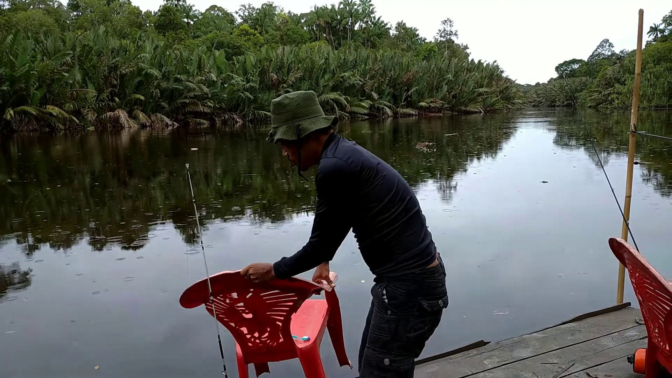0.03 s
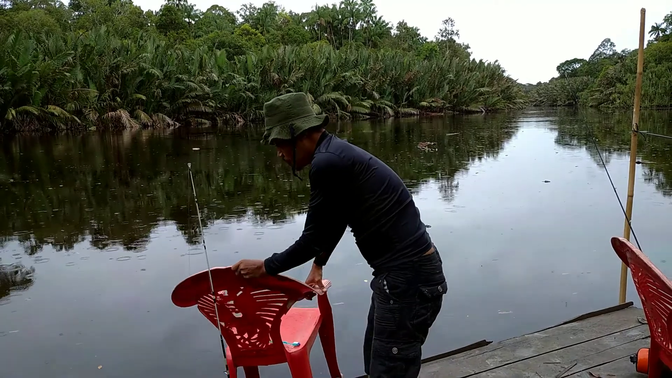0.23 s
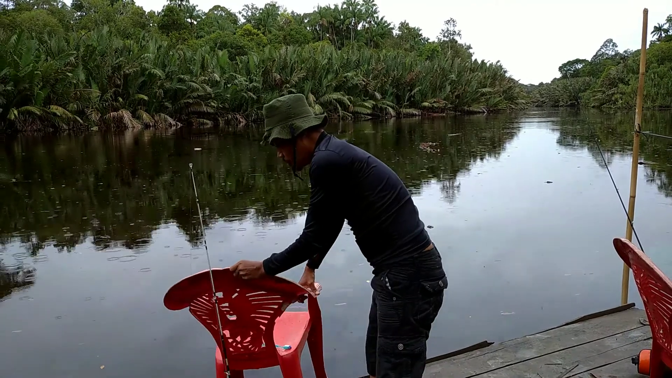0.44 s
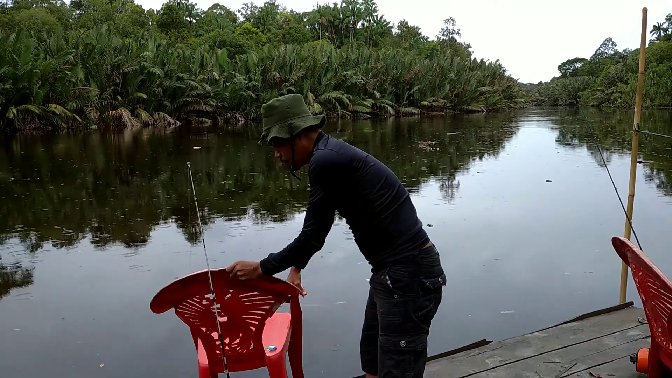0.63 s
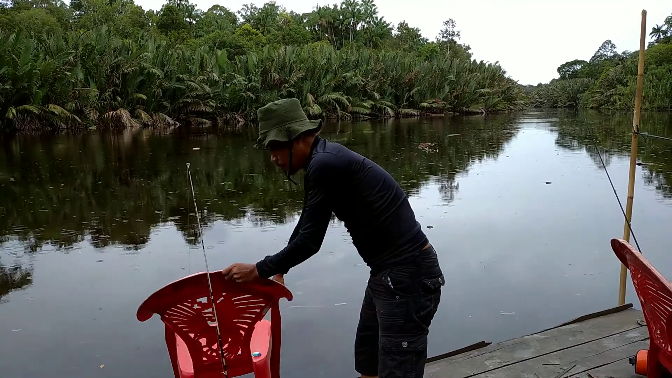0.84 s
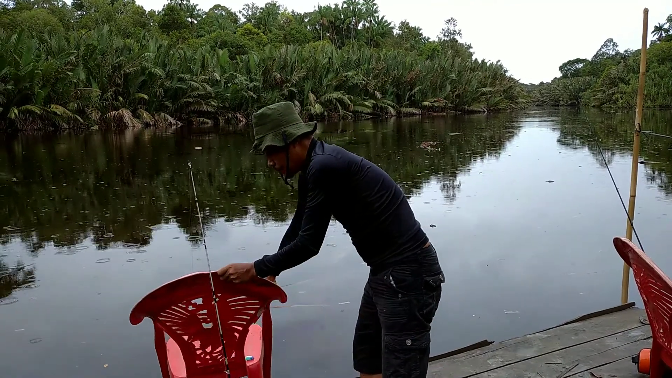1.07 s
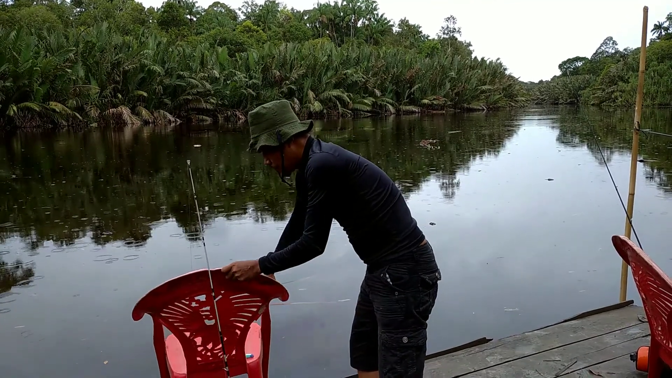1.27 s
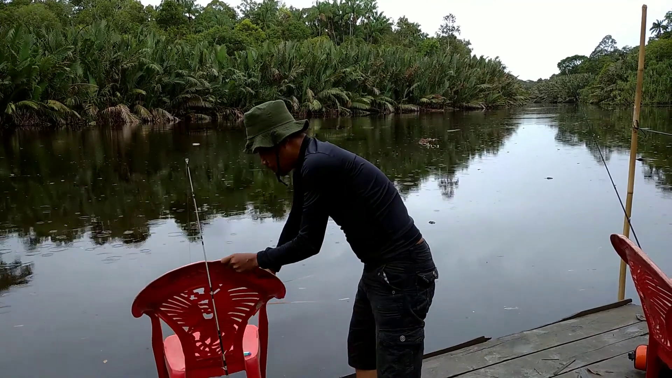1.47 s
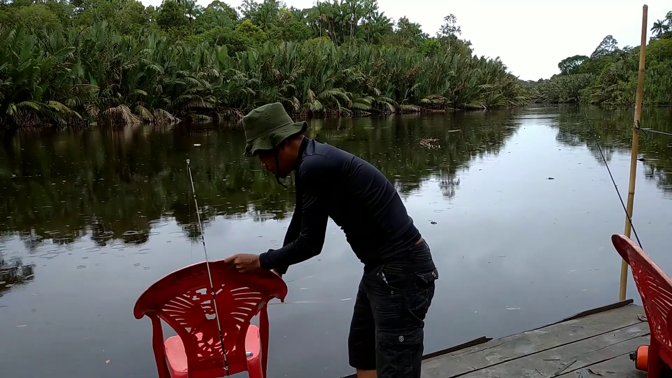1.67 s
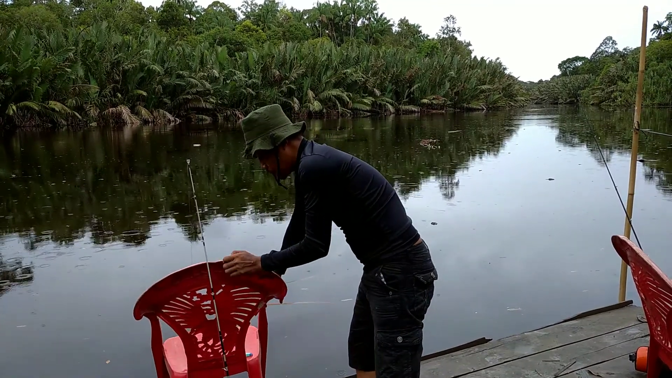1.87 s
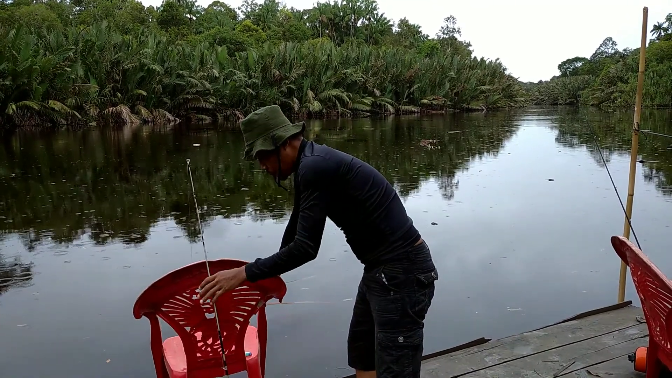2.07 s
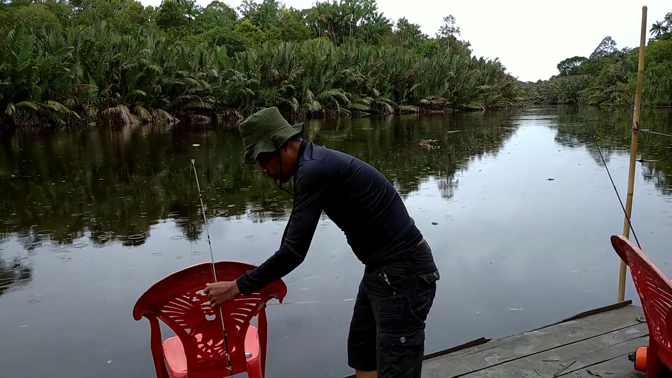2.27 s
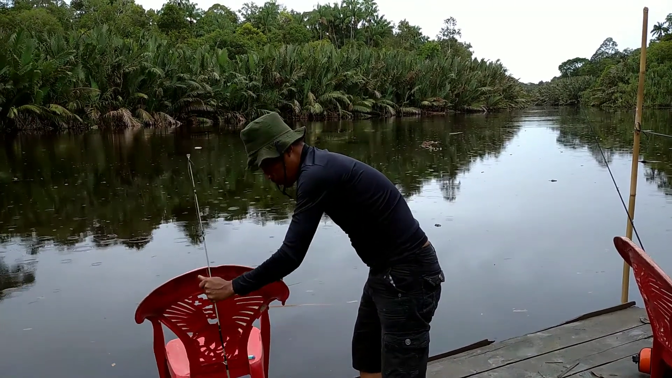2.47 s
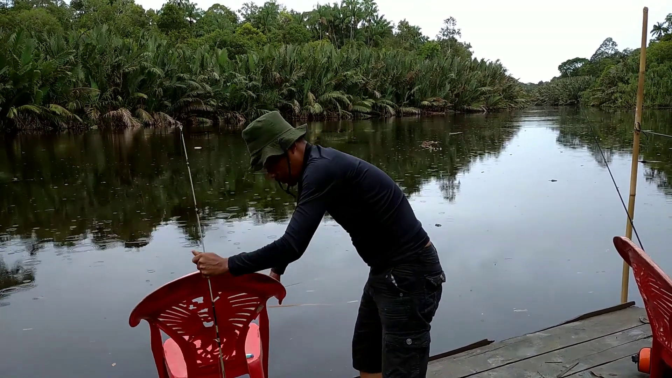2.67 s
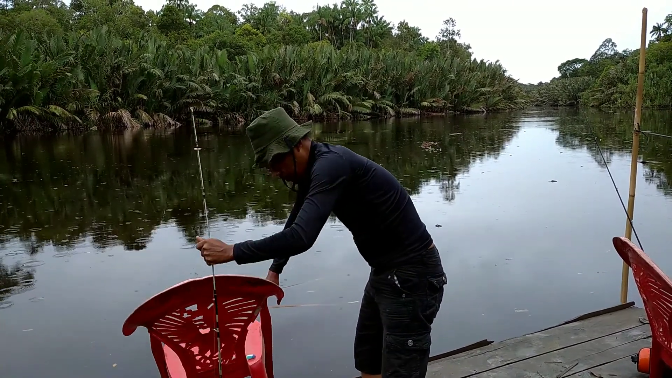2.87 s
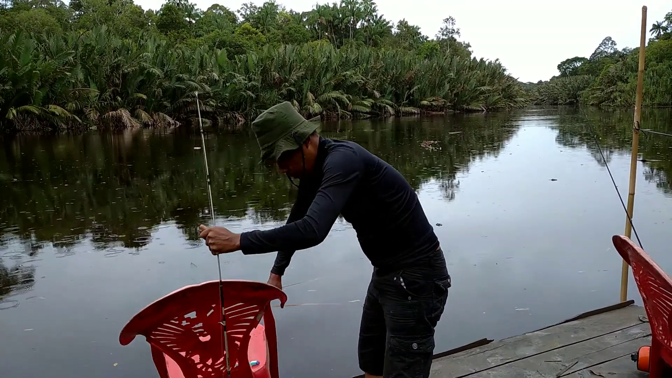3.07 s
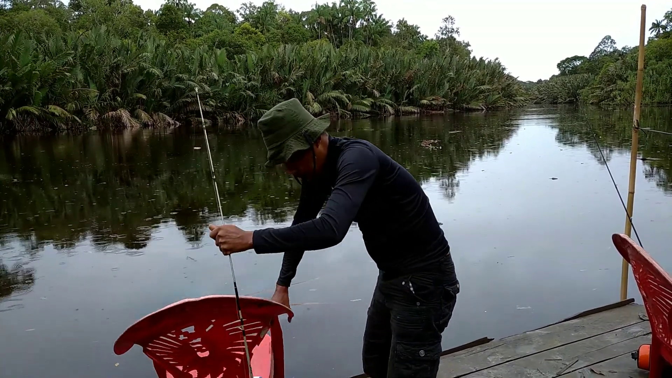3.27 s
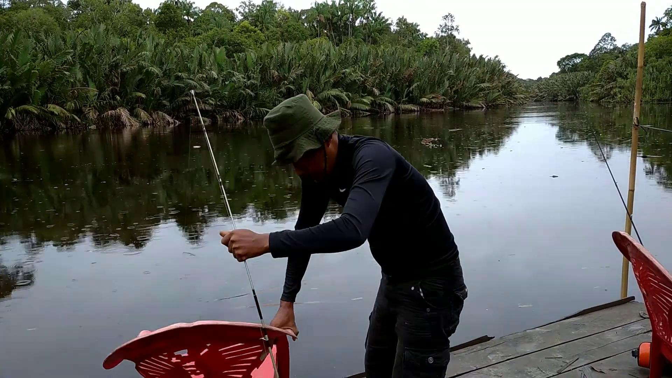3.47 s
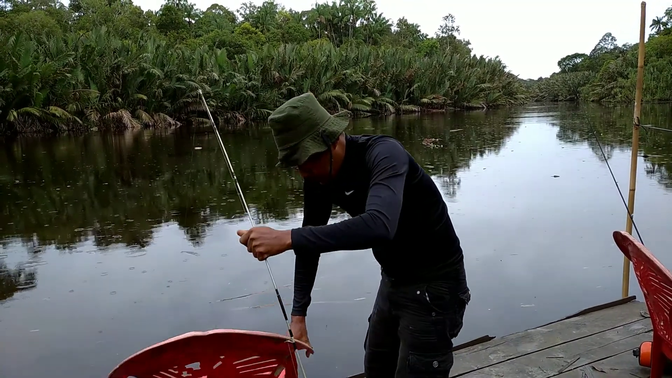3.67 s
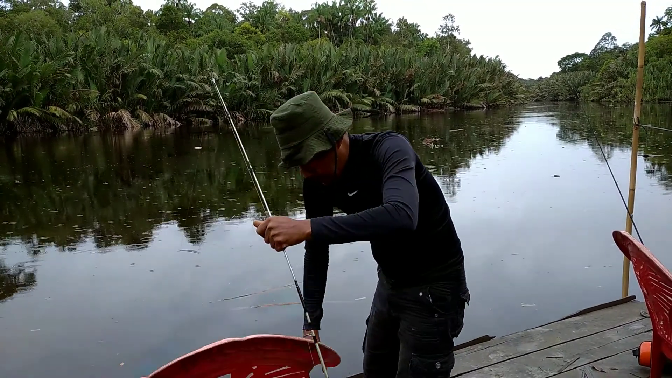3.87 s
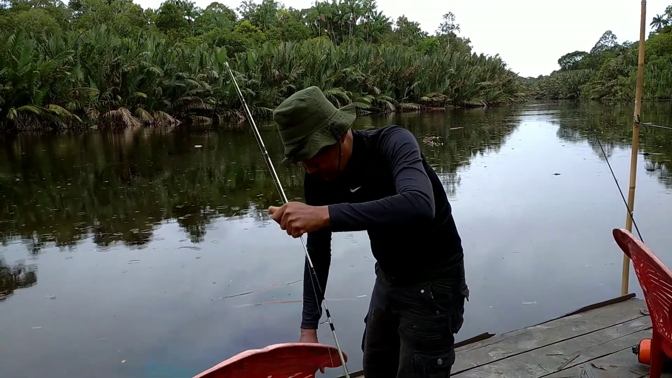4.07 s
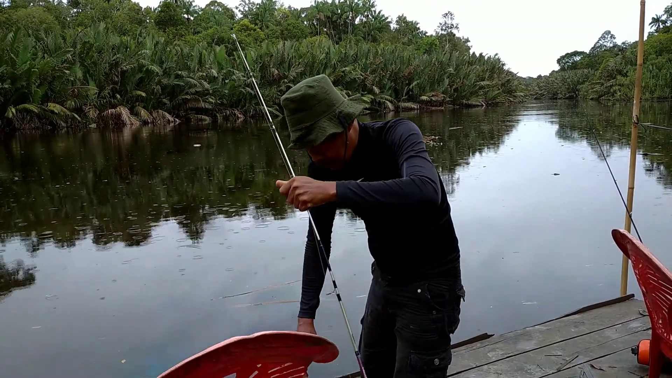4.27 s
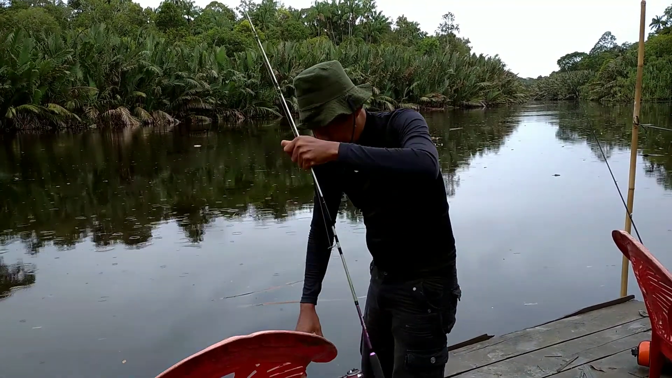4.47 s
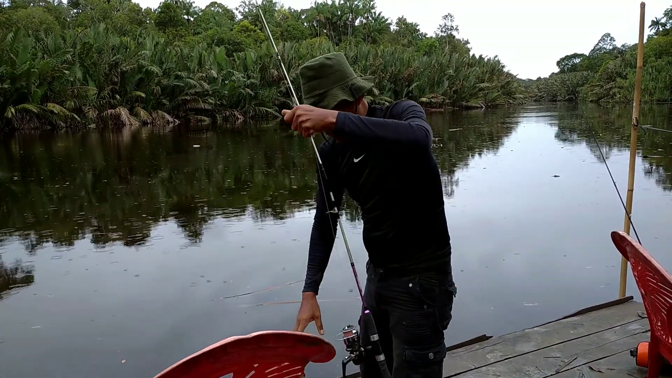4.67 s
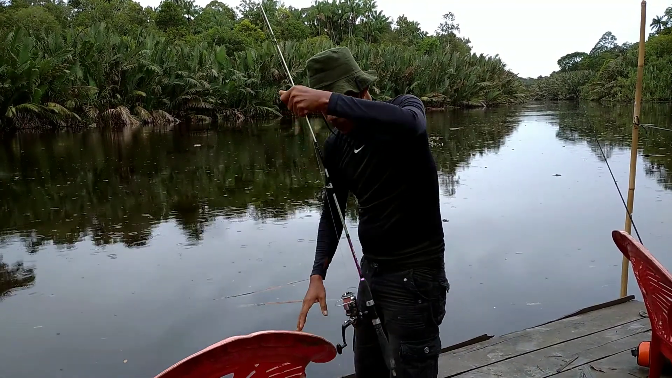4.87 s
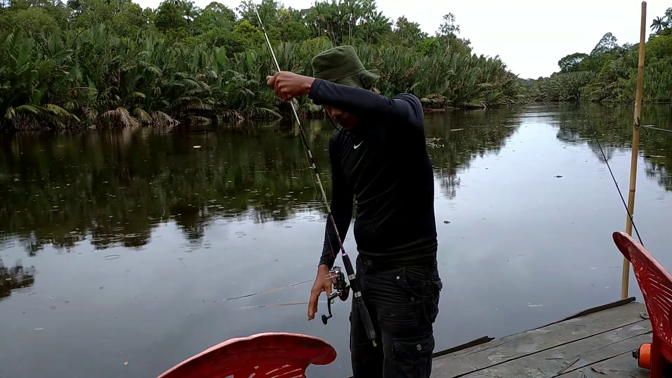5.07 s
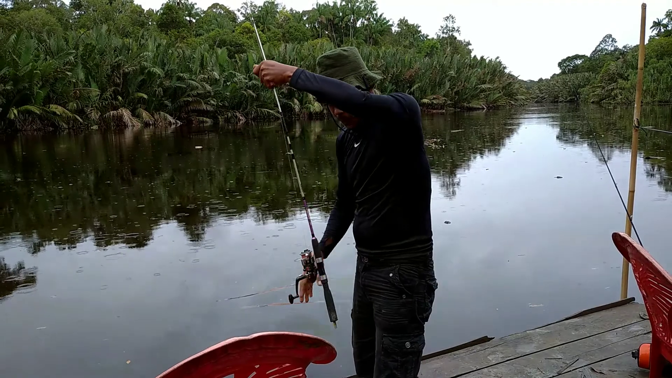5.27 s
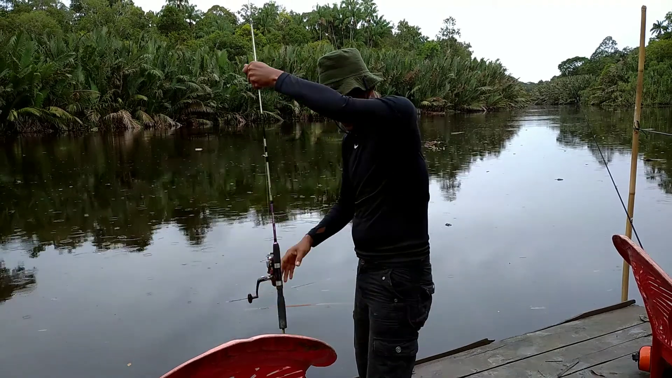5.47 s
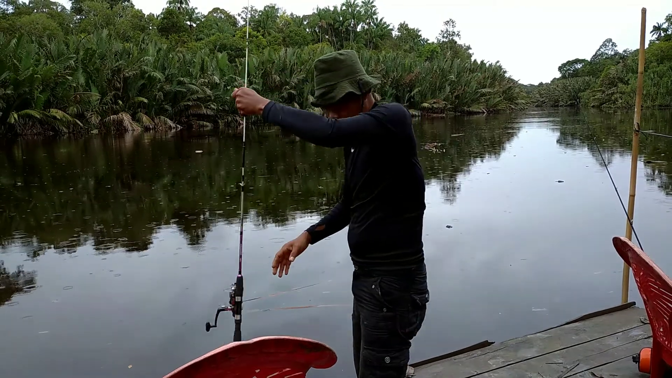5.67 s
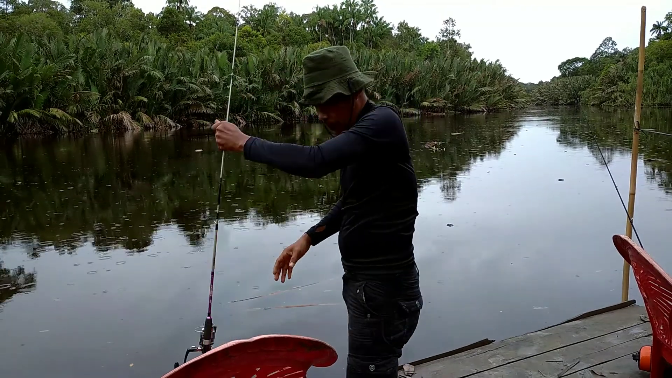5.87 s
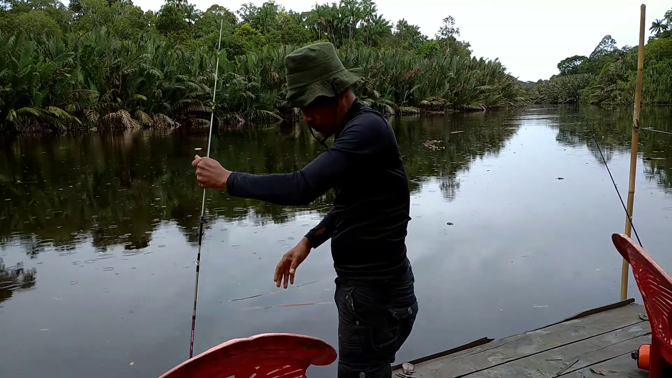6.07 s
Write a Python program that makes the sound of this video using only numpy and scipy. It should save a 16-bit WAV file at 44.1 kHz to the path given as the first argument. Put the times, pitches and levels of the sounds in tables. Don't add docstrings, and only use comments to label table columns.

```python
import sys
import numpy as np
from scipy import signal
from scipy.fft import rfft, irfft, next_fast_len
from scipy.io import wavfile
from scipy.ndimage import uniform_filter1d

SR = 44100
rng = np.random.default_rng(int(sys.argv[2]) if len(sys.argv) > 2 else 0)


def digitize_waveform(pressure):
    field = np.atleast_2d(pressure).T
    bounded = np.clip(field, -1, 1)
    quanta = np.round(bounded * 32767).astype(np.int16)
    wavfile.write(sys.argv[1], SR, quanta)


def boost_factor(decibels):
    exponent = np.asarray(decibels, float) / 20
    return 10 ** exponent


N = 269451


def evened(x):
    return x / np.sqrt(np.mean(x ** 2) + 1e-20)


def read(points, hz):
    f, value = np.transpose(points)
    return np.interp(np.log(hz + 1), np.log(f + 1), value)


def add(mix, start_s, sound):
    part = mix[round(start_s * SR):][:len(sound)]
    part += sound[:len(part)]


def coloured(x, points, share=1):
    size = next_fast_len(N)
    gain = boost_factor(share * read(points, np.fft.rfftfreq(size, 1 / SR)))
    return irfft(rfft(x, size) * gain, size)[..., :N]


def smoothed_twice(x, size):
    return evened(uniform_filter1d(uniform_filter1d(x, size=size), size=size))


def patch_map(noise, hz_bins, frames):
    return evened(uniform_filter1d(uniform_filter1d(noise, size=hz_bins, axis=0), size=frames, axis=1))


def body(x, modes):
    out = np.zeros(N)
    for k, (hz, width_hz, db) in enumerate(modes):
        out += (-1) ** k * boost_factor(db) * signal.lfilter(*signal.iirpeak(hz, hz / width_hz, SR), x)
    return evened(out)


def slips(per_s, spread_db, hiss):
    clicks = (rng.random(N) < per_s / SR) * boost_factor(spread_db * np.minimum(rng.exponential(1, N), 4))
    return evened(clicks * rng.choice([-1., 1.], N)) + hiss * rng.standard_normal(N)


def fade(t60, rise_s, hold_s=0):
    t = np.arange(round(.5 * SR)) / SR
    shape = (1 - np.exp(-t / rise_s)) * boost_factor(-60 * np.maximum(t - hold_s, 0) / max(t60, .01))
    return t, shape / shape.max()


def echoes(x, start_s, t60):
    t = np.arange(round(t60 * SR)) / SR
    taps = (rng.random((2, SR)) < .05) * rng.choice([-1., 1.], (2, SR))
    taps = taps[:, :len(t)] * boost_factor(-60 * t / t60) * (t > start_s)
    return signal.fftconvolve(x[None], taps / np.linalg.norm(taps[0]), axes=1)[:, :N]


# pitch_hz, likeness (0-1)
AIR_SAME = [(60, 0.31), (240, 0.45), (600, 0.28), (1000, 0), (14400, 0.025)]
# pitch_hz, level_db
AIR_LEAN = [(60, 17), (150, 12), (400, 14), (480, 1), (4830, -1.5), (14400, -2)]


def field(colour, level_db, patchy_db):
    frames, hz = N // 256 + 5, np.fft.rfftfreq(1024, 1 / SR)
    a, b, c, d, noise = rng.standard_normal((frames, 513, 5)).T
    patches = patch_map(noise, hz_bins=10, frames=20)
    same = np.clip(read(AIR_SAME, hz), -1, 1)[:, None]
    lean = read(AIR_LEAN, hz)[:, None]
    left = a + 1j * b
    right = same * left + np.sqrt(1 - same ** 2) * (c + 1j * d)
    z = np.array([left * boost_factor(0.22 * lean), right * boost_factor(-.7 * lean)])
    z *= boost_factor(read(colour, hz)[:, None] + patchy_db * patches)
    return boost_factor(level_db) * evened(signal.istft(z, nperseg=1024, noverlap=768)[1][:, :N])


# pitch_hz, density_db (per Hz)
RIVER = [(15, -61.5), (25, -52), (77, 6), (173, 2.5), (254, -3.5), (363, -3), (509, -5), (652, -3.5),
         (713, -6.5), (1500, -8.5), (2050, -0.5), (3150, -8), (5400, -12), (7020, -46), (11900, -120)]
# pitch_hz, density_db (per Hz)
INSECTS = [(3180, -50), (5400, -43), (5780, -8), (6790, -6), (7270, -7), (8150, -7.5), (9620, -25.5),
           (10900, -23.5), (12000, -21.5), (13200, -20.5), (13900, -22), (14900, -70)]
# time_s, level_db over the river
RUSTLE = [
    (5.5, -33),
    (5.56, -4.5),
    (6.11, -11),
]


def forest():
    water = field(RIVER, level_db=-63.5, patchy_db=1.3)
    time_s, level_db = np.transpose(RUSTLE)
    leaves = signal.filtfilt(*signal.butter(N=2, Wn=1900, btype="high", fs=SR), water)
    leaves = leaves * boost_factor(np.interp(np.arange(N) / SR, time_s, level_db, left=-120))
    return water + leaves + field(INSECTS, level_db=-61.5, patchy_db=1.3)


def cricket():
    tone_hz, pulses_per_s, first_s = 7028, 14.617, .0185
    t = np.arange(N) / SR
    turns = (t - first_s) * pulses_per_s + .5
    strength = boost_factor(0.55 * rng.standard_normal(200))[turns.astype(int)]
    pulse = np.exp(-.5 * ((turns % 1 - .5) / 0.18) ** 2)
    x = boost_factor(-67.5) * evened(strength * pulse * np.sin(2 * np.pi * tone_hz * t))
    return np.array([np.roll(x, shift=2), x]) * boost_factor([[-5.5], [3.5]])


def whistle(length_s, start_hz, middle_hz, end_hz):
    u = np.linspace(-1, 1, round(length_s * SR))
    hz = middle_hz + u * (end_hz - start_hz) / 2 + u ** 2 * ((end_hz + start_hz) / 2 - middle_hz)
    return boost_factor(-4.7 * u) * np.sin(2 * np.pi * np.cumsum(hz) / SR) * signal.windows.tukey(len(u), .25)


def glides(calls):
    out = np.zeros(N)
    for start_s, length_s, hz, glide_hz, db in calls:
        add(out, start_s, boost_factor(db) * whistle(length_s, hz - glide_hz / 2, hz, hz + glide_hz / 2))
    return out


# start_s, length_s, middle_hz, glide_hz, level_db
WHISTLES = [(0.411, 0.025, 1843, -130, -65), (0.643, 0.027, 1800, -100, -64.5),
            (0.686, 0.068, 2290, -29, -62), (0.75, 0.072, 2265, 185, -61), (0.985, 0.02, 3710, -37, -72.5),
            (1.06, 0.0944, 2200, -150, -59.5), (1.08, 0.063, 2150, -56, -67),
            (1.091, 0.07, 2980, 62, -65.5), (1.205, 0.082, 2990, -30, -70), (1.2, 0.045, 1765, -2, -65),
            (1.262, 0.022, 2400, -100, -69), (1.108, 0.03, 2600, -100, -64), (1, 0.05, 2260, -60, -71),
            (1.876, 0.048, 2654, 129, -72), (2.038, 0.0426, 3500, -450, -65), (2.15, 0.05, 2020, 500, -70),
            (2.2, 0.035, 2300, 20, -71), (2.366, 0.046, 2650, -260, -62), (2.51, 0.07, 2600, -60, -72),
            (4.549, 0.149, 1200, -110, -72), (0.65, 0.081, 503, -5, -76), (6.02, 0.086, 658, 10, -80),
            (5.266, 0.021, 2920, -510, -78), (5.409, 0.026, 4570, -520, -73.5)]
# start_s, length_s, middle_hz, glide_hz, level_db
BURIED = [
    (5.646, 0.079, 3880, 604, -70),
    (5.72, 0.17, 4320, 201, -72),
    (5.797, 0.06, 4690, 22, -73),
]
# start_s, level_db
CHIRPS = [
    (0.029, -69.5),
    (2.528, -68.5),
    (4.726, -67.5),
]
# length_s, start_hz, middle_hz, end_hz
RISE = (0.082, 3880, 4610, 4620)
DROP = (0.045, 4600, 4250, 3700)


def birds():
    clear, buried = glides(WHISTLES), glides(BURIED)
    hidden = np.zeros(N)
    for start_s, db in CHIRPS:
        add(hidden, start_s, boost_factor(db) * whistle(*RISE))
        add(hidden, start_s + .098, boost_factor(db + 5) * whistle(*DROP))
    near, *far = smoothed_twice(rng.standard_normal((3, N)), size=250)
    heard = (clear + .35 * hidden) * (.85 + .3 * near)
    flicker = .75 + .5 * np.array(far)
    echo = boost_factor(6.0) * echoes(clear + hidden + 0.98 * buried, start_s=0.0014, t60=0.93) * flicker
    return 2.5 * np.array([np.roll(heard, shift=9), heard]) + echo


# time_s, level_db
SLIDE = [
    (2.661, -62.5),
    (2.722, -49.5),
    (2.774, -64),
    (2.964, -48.5),
    (2.99, -52.5),
    (3.064, -40),
    (3.096, -54),
    (3.146, -43),
    (3.291, -52.5),
]
# pitch_hz, width_hz, level_db
CREEP = [(250, 27.5, -1.5), (344, 58, -2), (518, 110, -7.5), (766, 150, -9), (1147, 500, -12)]
# pitch_hz, width_hz, level_db
SEAT = [(550, 120, -4), (770, 170, -0.5), (1000, 150, -0.5), (1186, 160, 0)]
# time_s, level_db
RUBBING = [
    [(2.67, -64), (2.714, -60), (2.72, -67), (2.734, -58), (2.75, -69), (2.818, -62), (2.83, -69)],
    [(2.84, -69), (3.032, -60), (3.074, -54), (3.118, -60), (3.124, -59), (3.2, -57), (3.208, -69),
     (3.228, -49), (3.24, -56)],
]


def slide():
    t = np.arange(N) / SR
    level, first, second = (boost_factor(np.interp(t, *np.transpose(rows), left=-120, right=-120) - 3.5)
                            for rows in (SLIDE, *RUBBING))
    drive = slips(per_s=270, spread_db=3.5, hiss=0.77)
    other = np.roll(drive, shift=9000)
    creep = level * body(body(drive, CREEP), CREEP)
    light_hum = first * body(other, SEAT[:2])
    return creep + light_hum + second * body(body(other, SEAT), SEAT)


# start_s, peak_db, pitch_hz, high_ring_db
SNAPS = [(0.2485, -38, 2860, -28), (0.2744, -62, 2510, -21), (1.6874, -58, 4570, -15),
         (3.3131, -26.5, 4600, 4), (3.955, -31, 2400, -19.5), (4.3074, -38, 2250, -21),
         (4.3078, -42, 3120, -21), (4.394, -48, 3600, -3), (4.4057, -42, 3300, -10),
         (4.421, -45, 3650, -15), (4.465, -36.5, 2440, 0), (4.4894, -45, 2520, -5), (5.347, -44, 2720, -25),
         (5.347, -56, 4320, -25)]


def snaps():
    out = np.zeros(N)
    for start_s, db, hz, high_db in SNAPS:
        t, shape = fade(0.0081, rise_s=0.0001)
        tick = rng.standard_normal(len(t)) * fade(0.0055, rise_s=0.00011)[1]
        rings = np.sin(2 * np.pi * hz * t) + boost_factor(high_db) * np.sin(2 * np.pi * 8900 * t)
        add(out, start_s, boost_factor(db - 2.0) * (shape * rings + 0.32 * tick))
    return out


# start_s, peak_db, pitch_hz
CLATTER = [(3.801, -30, 2000), (3.811, -25, 2600), (3.815, -36, 4100), (3.826, -32, 2500),
           (3.834, -27, 1890), (3.851, -23, 1060), (3.857, -34, 3900), (3.862, -34, 3300),
           (3.869, -33, 2320), (3.876, -32, 2400), (3.897, -34, 3000), (3.905, -30, 2290),
           (3.905, -37.5, 5360), (3.908, -26, 1300), (3.916, -33, 2200), (3.927, -34, 1200),
           (3.954, -37.5, 4500), (3.957, -33, 796), (3.993, -38, 1700), (3.715, -38, 2230),
           (3.742, -36, 2180), (3.745, -36, 8900), (3.790, -36, 8800), (3.897, -27, 9100),
           (3.955, -44, 9000), (4.371, -32, 2980), (4.377, -31, 2200), (4.375, -45, 4500),
           (4.391, -28, 1000), (4.397, -31, 850), (4.407, -32, 1510), (4.408, -34, 1980),
           (4.417, -46, 4730), (4.423, -46, 3600), (4.359, -43, 800), (4.126, -38, 1300),
           (4.139, -25.5, 400), (4.156, -35, 350), (4.064, -37.5, 400), (4.098, -37, 350),
           (3.973, -32, 300), (3.813, -37.5, 5200), (4.452, -32, 450), (4.437, -39, 2000),
           (4.444, -37, 1900), (4.447, -48, 4500), (4.471, -41, 1900), (4.493, -47, 2000),
           (4.306, -45, 1520), (1.334, -45, 1500), (1.340, -48, 1770), (1.186, -44, 1600),
           (1.211, -51, 1160), (1.237, -47, 1400), (1.384, -47, 650), (3.9, -27, 412), (3.914, -26, 400),
           (3.93, -28, 380)]


def clatter():
    out = np.zeros(N)
    for start_s, db, hz in CLATTER:
        t, shape = fade(0.0093 + 9 / hz, rise_s=0.0006)
        add(out, start_s - .0015, boost_factor(db - 4.0) * shape * np.sin(2 * np.pi * hz * t))
    return out


# time_s, weight_db on the boards, speed (0-1)
DRAG = [
    [(0.82, -78, 1), (0.932, -56.5, 0.6), (1.058, -54, 0.66), (1.23, -69.5, 0.9), (1.374, -52.5, 0.46),
     (1.502, -65, 0.6), (1.6, -76, .65)],
    [(1.7, -60.5, 0.25), (1.95, -79, 0.9)],
    [(3.2, -56, 0), (3.288, -46, 0.02), (3.61, -56, 0.62), (3.756, -46.5, 0.62), (3.83, -46.5, 0.92),
     (4.01, -56, 0.4)],
    [(3.99, -61.5, 0.64), (4.146, -42, 0.46), (4.306, -60, 0.85), (4.39, -46.5, 1), (4.566, -61.5, 0.3),
     (4.66, -65, 0.8)],
]


def rubbing(slow_db, speed_db):
    out = np.zeros(N)
    for rows in DRAG:
        time_s, weight_db, speed = np.transpose(rows)
        t = np.arange(time_s[0], time_s[-1], 1 / SR)
        level = boost_factor(np.interp(t, time_s, weight_db + slow_db + speed_db * speed))
        add(out, time_s[0], level * signal.windows.tukey(len(t), .1))
    return out


# start_s, peak_db,
# pitch_hz, t60_s
THUMPS = [(0.193, -51, 146, 0.032), (0.229, -31.5, 195, 0.045), (0.25, -41, 161, 0.45),
          (0.291, -39.5, 180, 0.082), (0.459, -41, 194, 0.14), (0.615, -54.5, 295, 0.15),
          (0.706, -56.5, 145, 0.072), (0.885, -43.5, 180, 0.15), (0.974, -48, 418, 0.21),
          (1.055, -41, 227, 0.16), (1.148, -48.5, 191.5, 0.71), (1.21, -46.5, 250, 0.08),
          (1.314, -30, 238, 0.076), (1.494, -49, 184, 0.24), (1.72, -57.5, 243, 0.64),
          (1.795, -41.5, 284, 0.24), (1.858, -46.5, 180, 0.023), (2.322, -52, 133, 0.06),
          (2.523, -60, 255, 0.17), (4.793, -52.5, 127, 0.037), (4.841, -49, 153, 0.047),
          (4.862, -57, 165, 0.12), (5.252, -44.5, 144, 0.052), (5.273, -51, 180, 0.014),
          (5.299, -47.5, 158, 0.028),
          (2.689, -53.5, 331, 0.37), (2.86, -52.5, 198, 0.2), (2.956, -45.5, 252, 0.14),
         (3.054, -41.5, 376, 0.28), (3.315, -25.5, 393, 0.076), (3.342, -37, 250, 0.063),
         (3.403, -34, 304, 0.044), (3.447, -37.5, 139, 0.13), (3.513, -40.5, 146, 0.26),
         (3.584, -35.5, 180, 0.22), (3.666, -39.5, 226, 0.31), (3.81, -28.5, 237, 0.18),
         (3.885, -21.5, 336, 0.051), (3.896, -18, 406, 0.14), (3.951, -28.5, 320, 0.1),
         (3.978, -33.5, 167, 0.18), (4.059, -39, 309, 0.23), (4.13, -34.5, 384, 0.05),
         (4.14, -36, 258, 0.12), (3.193, -41.5, 325, 0.043), (3.646, -40, 300, 0.06),
         (3.534, -44, 250, 0.065), (4.365, -20.5, 228.6, 0.16), (4.404, -28.5, 202, 0.16),
         (4.439, -28.5, 344, 0.044), (4.472, -37.5, 188, 0.076), (4.497, -46.5, 250, 0.069),
         (4.52, -51, 226, 0.13), (2.888, -47.5, 301, 0.15), (3.099, -46, 390, 0.11), (3.14, -47, 330, 0.08),
         (3.165, -50, 340, 0.1)]
# pitch_hz, width_hz, level_db
BOARDS = [(118, 39, -6), (180, 53.5, 2), (221, 42.4, 4), (340, 142, -0.5), (424, 105, -2), (531, 74, -10)]


def boards():
    rings, shake = np.zeros(N), rubbing(slow_db=-0.5, speed_db=-2.5)
    for start_s, db, hz, t60 in THUMPS:
        t, ring = fade(t60, rise_s=0.0033)
        push = fade(6.8 / hz, rise_s=0.0019)[1]
        add(rings, start_s, boost_factor(db) * (boost_factor(-7.0) * ring + boost_factor(-5.0) * push) * np.sin(2 * np.pi * hz * t))
        add(shake, start_s, boost_factor(db - 10) * fade(0.94 * t60, rise_s=0.0072)[1])
    return rings + shake * body(slips(per_s=300, spread_db=0.0, hiss=0.66), BOARDS)


def patchy(x, depth_db):
    z = signal.stft(x, nperseg=256)[2]
    patches = patch_map(rng.standard_normal(z.shape[:0:-1]).T, hz_bins=8, frames=4)
    return evened(signal.istft(z * boost_factor(depth_db * patches), nperseg=256)[1][:, :N])


# start_s, peak_db, pitch_hz, grit_db over the shell, t60_s
KNOCKS = [(0.23, -41.5, 870, -19, 0.41), (0.293, -46, 870, -19, 0.13), (1.057, -31, 753, -39, 0.054),
          (1.183, -47, 990, -23, 0.21), (1.223, -45, 1780, -19, 0.11), (1.31, -33.5, 600, -38, 0.094),
          (1.363, -40, 634, -31, 0.051), (1.793, -43, 1050, -32, 0.22), (2.529, -48.5, 720, -14, 0.27),
          (3.313, -28.5, 930, -6, 0.12), (3.342, -30.5, 740, -18, 0.068), (3.403, -32.5, 880, -20, 0.037),
          (3.417, -34, 1585, -15, 0.025), (3.668, -28.5, 1060, -14, 0.055),
          (3.896, -15.5, 1060, -25, 0.042), (3.904, -21, 710, -10.5, 0.04), (3.888, -19, 1340, -21, 0.024),
          (3.951, -23, 894, -17, 0.2), (4.131, -24, 812, -10.5, 0.011), (4.134, -19, 710, -24, 0.024),
          (4.246, -43, 690, -23, 0.043), (4.282, -46, 1950, -7, 0.089), (4.132, -20.5, 1664, -25, 0.021),
          (4.131, -21.5, 1107, -25, .02), (4.363, -15.5, 1082, -24, 0.032), (4.365, -19, 1925, -24, 0.0099),
          (4.405, -33, 1290, -10, 0.04), (4.439, -38, 630, 0, 0.06), (3.8, -21, 1780, -22, 0.036),
          (3.818, -23, 1700, -26, 0.04), (3.831, -26, 1420, -22, 0.045), (3.740, -41, 1040, -16, 0.03),
          (3.252, -37, 1020, -25, 0.03), (3.492, -45, 2610, -20, 0.02), (3.580, -35.5, 2100, -17, 0.022),
          (3.678, -31, 785, -15, 0.04), (3.296, -37, 1010, -22, 0.032)]
# start_s, peak_db, grit_db over the shell, t60_s
SKIDS = [(0.246, -46.5, -6, 0.1), (0.265, -59, -12, 0.07), (0.882, -48.5, -10, 0.28),
         (2.79, -59, 4.5, 0.77), (2.997, -52.5, 1, 1), (3.123, -53.5, -1, 0.49), (3.22, -42, -23, 0.022),
         (3.252, -43, -18, 0.05), (3.264, -37, -20, 0.046), (3.28, -38, -12, 0.036),
         (3.470, -40.5, -7, 0.026), (3.507, -36.5, -9, 0.013), (3.53, -40.5, -3, 0.011),
         (3.576, -40.5, -4, 0.11), (3.606, -36.5, -11, 0.11), (3.643, -36.5, -14, 0.11),
         (3.711, -29.5, -6.5, 0.043), (3.739, -29, -5.5, 0.024), (3.787, -26.5, -4.5, 0.19),
         (3.813, -35, -36, 0.081), (3.849, -22.5, -8.5, 0.19), (3.887, -22.5, -17, 0.021),
         (3.924, -32, -31, 0.024), (4.05, -42.5, -5.5, 0.04), (4.095, -45.5, -5, 0.16),
         (4.373, -39, -11, 0.05), (4.392, -39.5, -2, 0.03), (4.415, -34.5, -7, 0.044),
         (4.446, -47, -5, 0.04), (4.467, -47, -4, 0.076), (4.489, -53, -18, 0.047)]
# pitch_hz, width_hz, level_db
SHELL = [(690, 590, -2.5), (982, 390, 2), (1110, 130, 1.5), (1450, 264, -3.5), (1650, 220, -2),
         (1840, 190, -0.5), (2100, 484, -3), (2437, 360, -3.5), (3010, 610, -17.5)]
# pitch_hz, density_db (per Hz)
GRIT = [(1500, -25), (2400, -4), (3000, -11), (4500, -8), (6000, -17), (8600, -7), (9800, -13.5),
        (10800, -27.5), (13500, -25.5), (14900, -50)]


def legs():
    skid_hz, skid_hold_s, knock_hold_s = 1083, 0.016, 0.00077
    knocks, sing = np.zeros(N), np.zeros(N)
    rattle = rubbing(slow_db=-13.5, speed_db=13)
    grind = rubbing(slow_db=-40, speed_db=38.5)
    catches = [(*row, False) for row in KNOCKS]
    catches += [(s, db, skid_hz, grit_db, t60, True) for s, db, grit_db, t60 in SKIDS]
    t, strike = fade(0.023, rise_s=0.00065)
    clack = sum(boost_factor(mode_db) * np.sin(2 * np.pi * mode_hz * t) for mode_hz, _, mode_db in SHELL)
    for start_s, db, hz, grit_db, t60, skids in catches:
        hold_s = skid_hold_s if skids else knock_hold_s
        knock_db = db - 7.5 - 2 * skids
        add(knocks, start_s, boost_factor(knock_db) * strike * (np.sin(2 * np.pi * hz * t) + 0.23 * clack))
        add(rattle, start_s, boost_factor(db - 14) * fade(t60, 0.00026, hold_s)[1])
        add(grind, start_s, boost_factor(db + grit_db - 11.0) * fade(1.31 * t60, 0.0014, hold_s)[1])
        if skids:
            add(sing, start_s, boost_factor(db - 22) * fade(t60, 0.0013, hold_s)[1])
    shared, left, right = (slips(per_s=1500, spread_db=3.5, hiss=0.58) for _ in range(3))
    shell = np.array([body(shared + 0.3 * own, SHELL) for own in (left, right)])
    scrape = np.array([shared + 4.7 * left, shared + 2.1 * right])
    grit = evened(coloured(scrape + 2.5 * rng.standard_normal((2, N)), GRIT))
    grit = patchy(grit, depth_db=2.8)
    clumps = boost_factor(3.5 * smoothed_twice(np.array([left, right]), size=180) - 1.5)[0]
    song = sing * body(shared, [(skid_hz, 75, 0)])
    return knocks + song + rattle * clumps * shell + grind * grit


# pitch_hz, level_db
LEAN = [(60, 3), (120, 6), (405, 5), (480, 0.5), (900, 0.1), (1200, 2), (1800, 1), (3670, -2.5), (7280, 0)]


def chair():
    left, right = boards() + legs() + slide() + snaps() + clatter()
    upper = signal.lfilter(*signal.butter(N=4, Wn=1100, btype="high", fs=SR), right)
    bass = signal.filtfilt(*signal.butter(N=4, Wn=1300, fs=SR), left)
    left = np.roll(bass, shift=2) + np.roll(left - bass, shift=8)
    pair = np.array([left, right]) + boost_factor(-7.0) * echoes(upper, start_s=0.00096, t60=0.033)
    return np.array([coloured(pair[0], LEAN, 0.59), coloured(pair[1], LEAN, -1.96)])


def scene():
    return forest() + cricket() + birds() + chair()


def roll_off(x):
    return signal.sosfilt(signal.butter(12, 14450, fs=SR, output="sos"), x)


# pitch_hz, level_db
COLOUR = [(20, -20), (50, -10), (90, 0), (4700, 2), (4950, -6), (5350, -2), (5700, -1.5), (14200, -4),
          (14700, -17)]


def record(dry):
    mix = coloured(dry, COLOUR)
    return roll_off(mix)


dry = scene()
out = record(dry)
digitize_waveform(out)
```